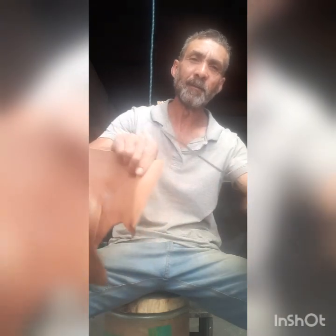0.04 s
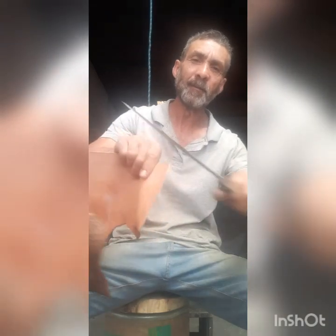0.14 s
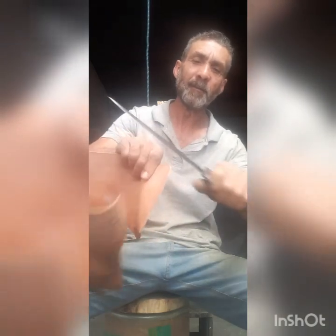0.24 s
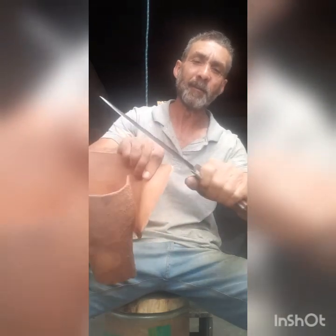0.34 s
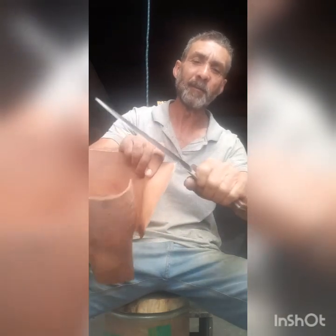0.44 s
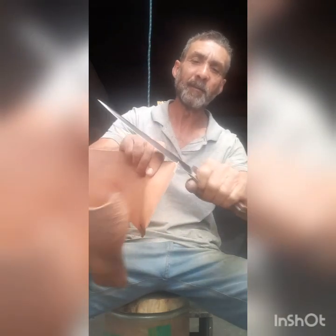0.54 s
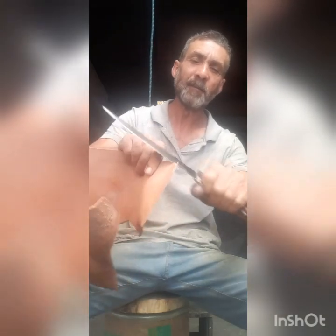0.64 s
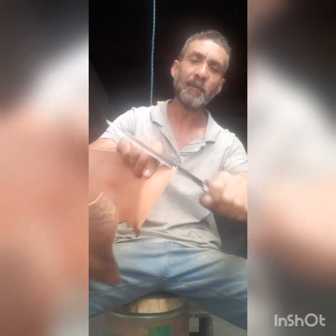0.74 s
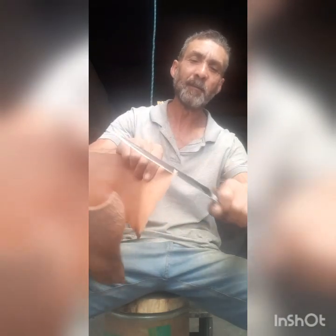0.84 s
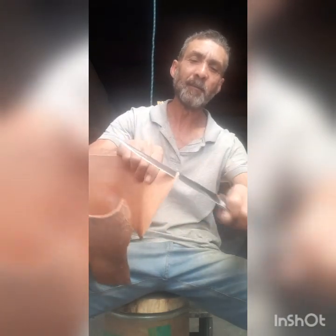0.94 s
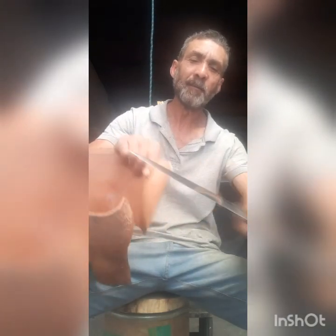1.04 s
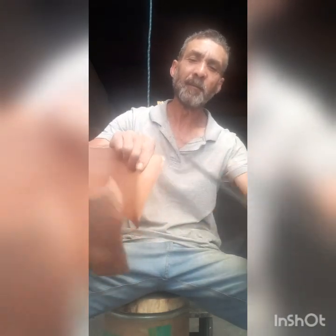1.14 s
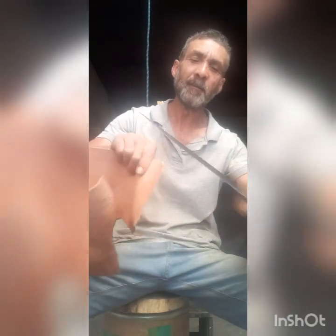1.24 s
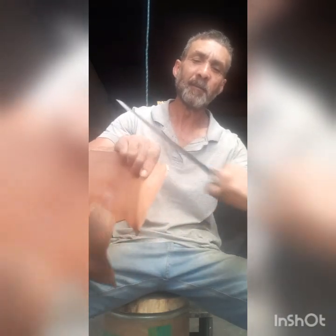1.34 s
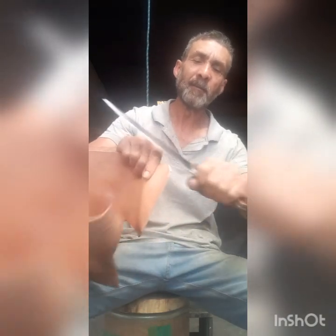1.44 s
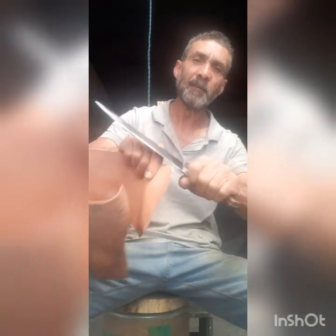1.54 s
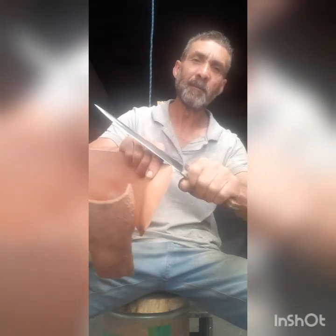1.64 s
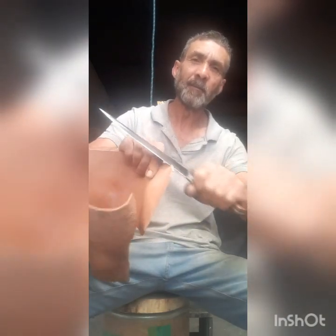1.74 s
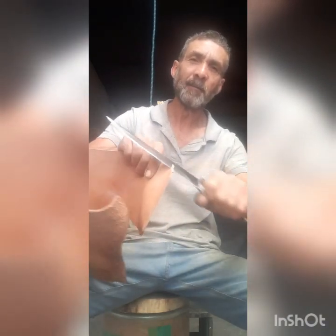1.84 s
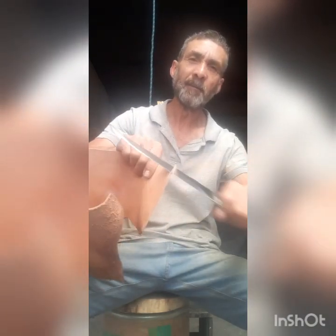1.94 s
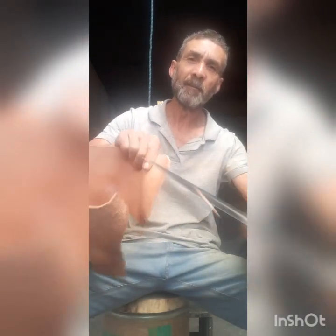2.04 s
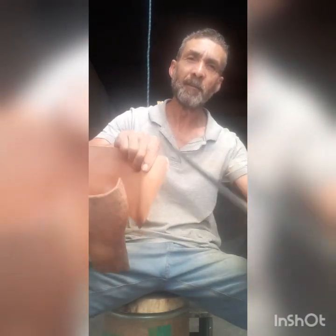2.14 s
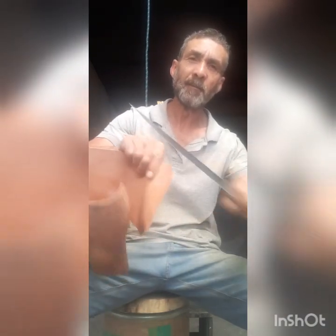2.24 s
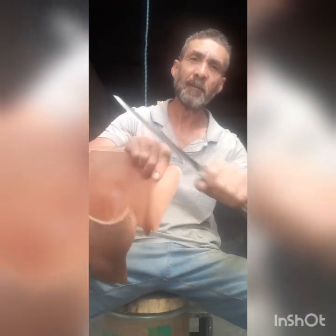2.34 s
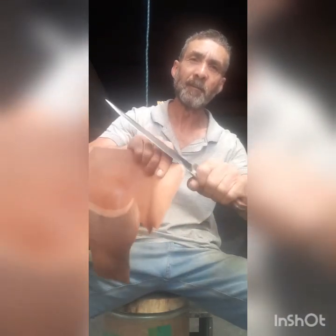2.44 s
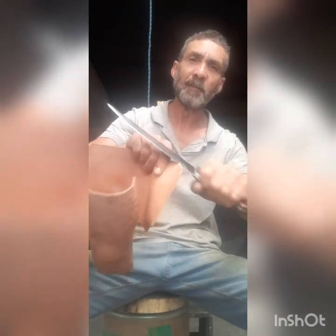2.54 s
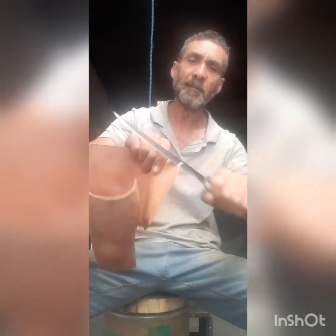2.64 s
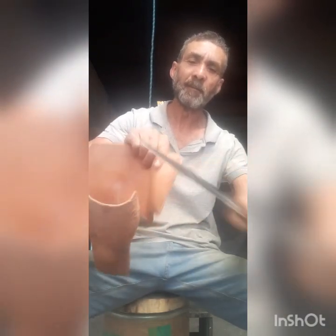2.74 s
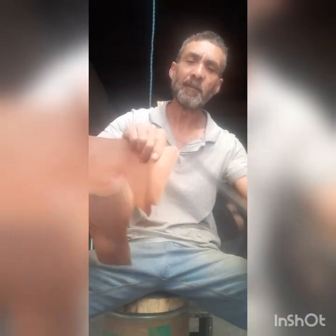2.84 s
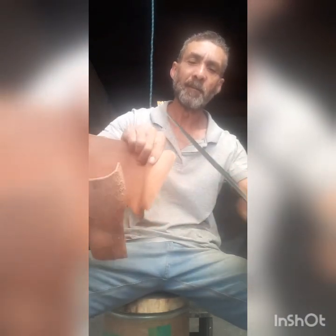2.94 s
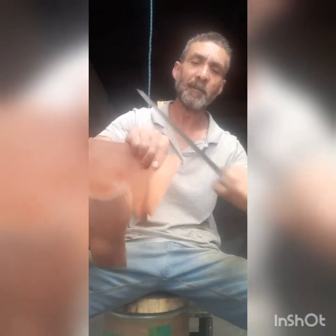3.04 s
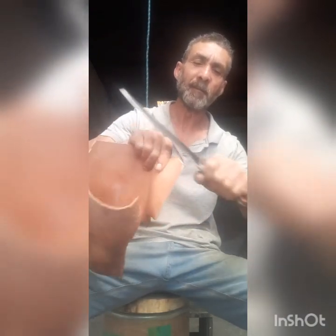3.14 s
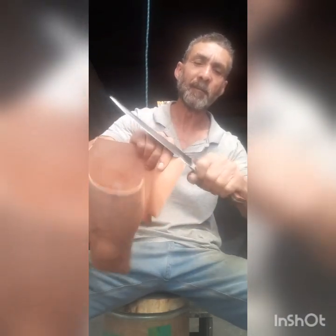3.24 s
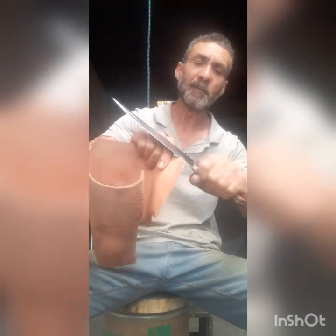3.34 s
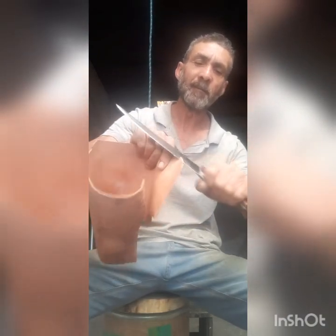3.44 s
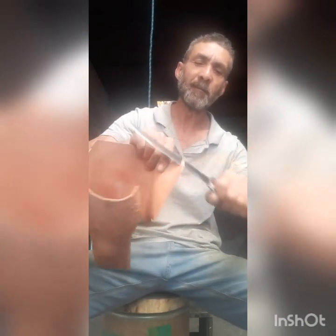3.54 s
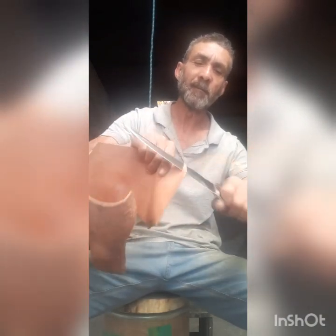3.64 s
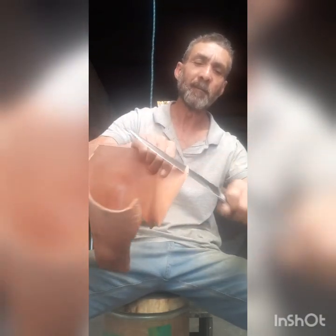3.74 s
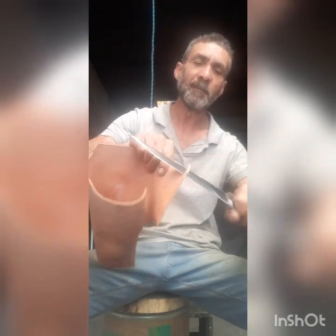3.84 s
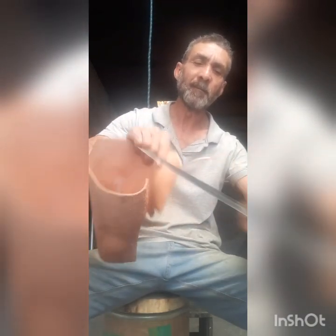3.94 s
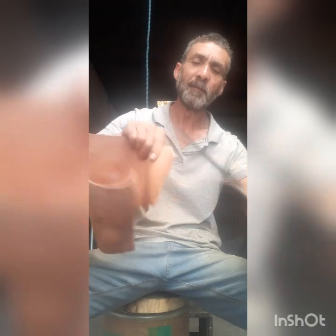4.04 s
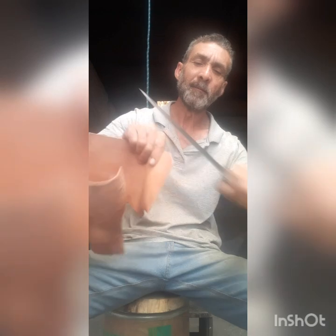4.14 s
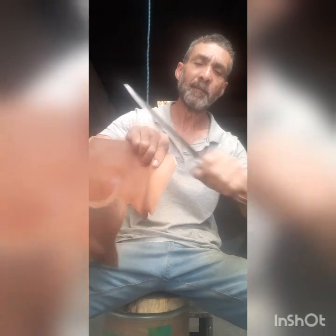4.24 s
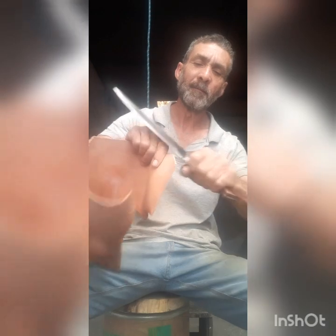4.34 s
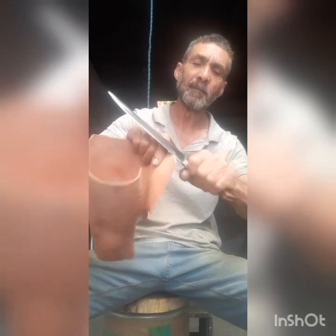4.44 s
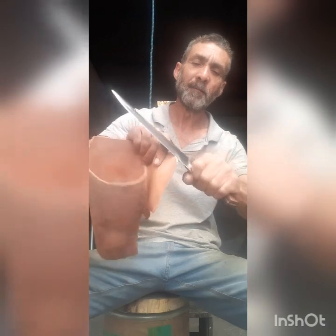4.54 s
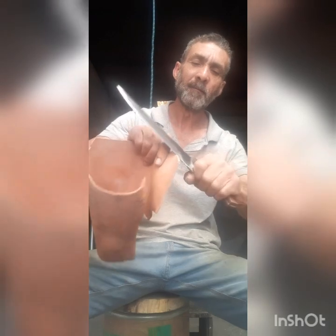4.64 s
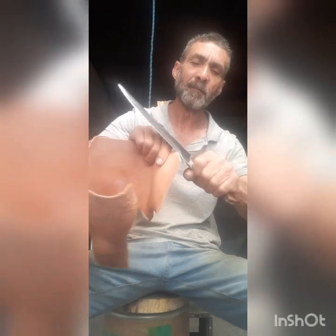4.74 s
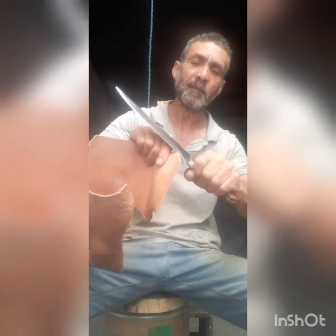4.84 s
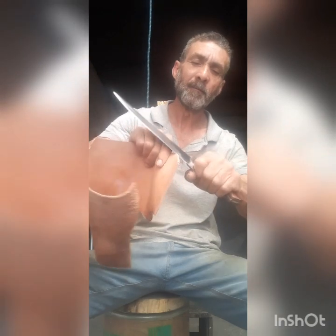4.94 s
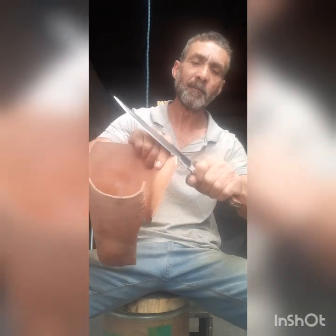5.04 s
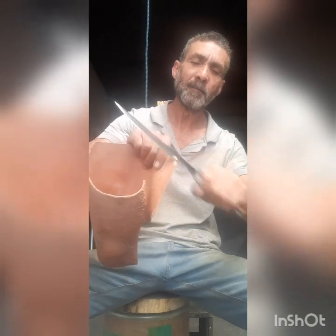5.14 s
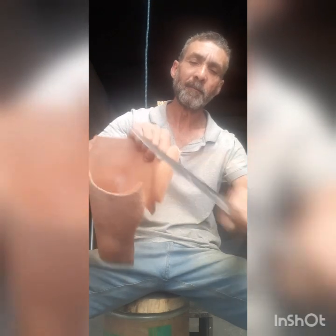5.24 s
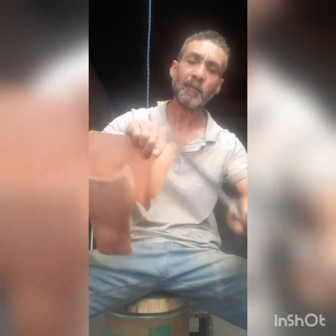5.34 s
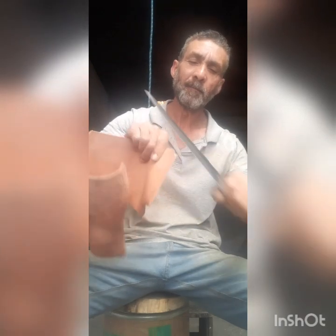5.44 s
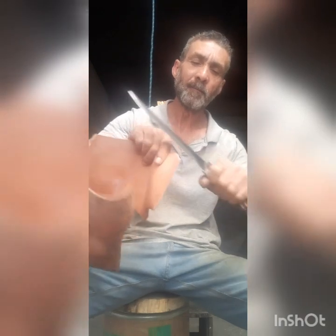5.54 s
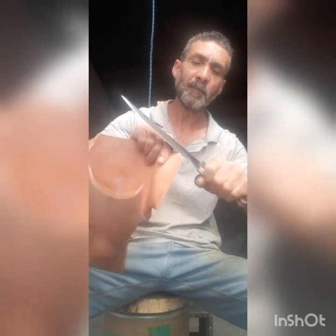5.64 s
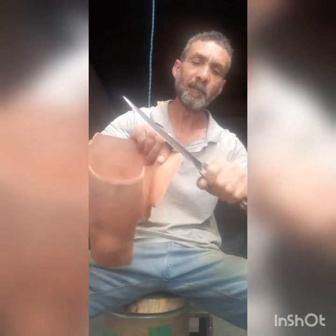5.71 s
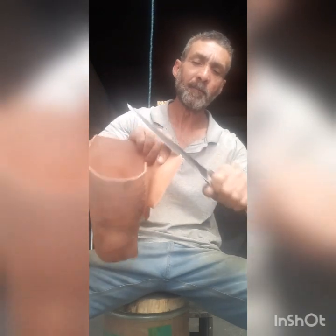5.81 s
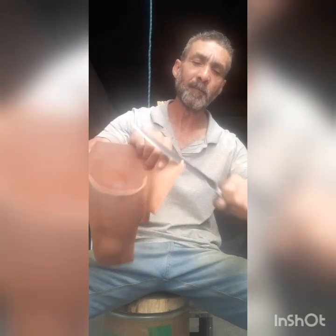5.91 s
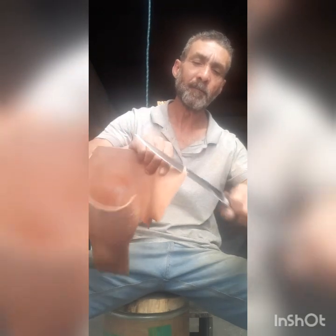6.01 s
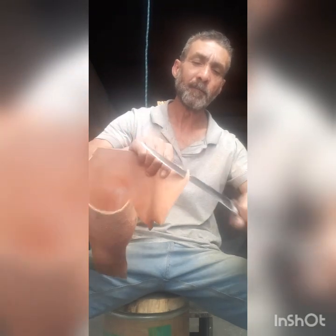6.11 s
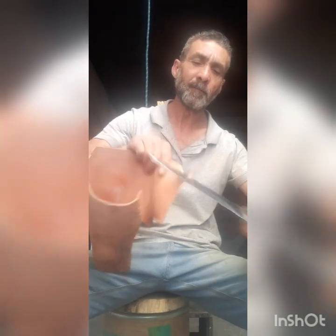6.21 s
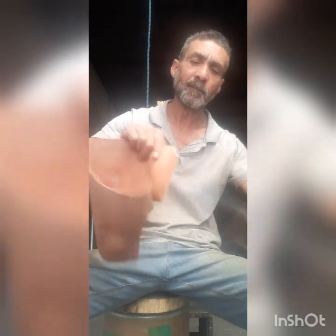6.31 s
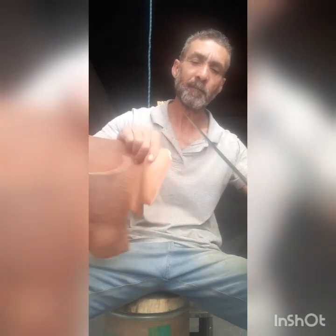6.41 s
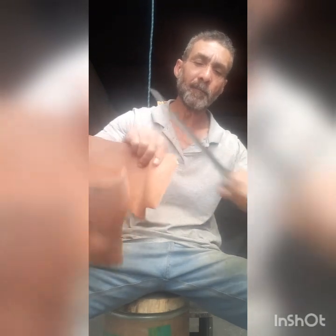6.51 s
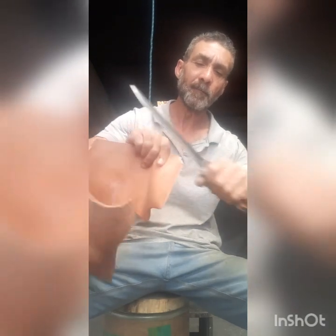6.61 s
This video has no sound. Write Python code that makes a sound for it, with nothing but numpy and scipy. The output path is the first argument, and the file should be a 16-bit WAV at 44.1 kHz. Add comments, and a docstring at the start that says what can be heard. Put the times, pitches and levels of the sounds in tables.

```python
"""A low engine-like drone flutters over rumble and a hiss that dims in places; a tick and a rustle, then a bird.
Soon a long knife is drawn across the edge of a stiff hide in short strokes, an arm's length from a phone in a shed.
The edge sticks and slips: random knocks ring the hide's modes, and brighter ones hiss as fibres part.
Its jumps thump the hide and ping the blade. Shaped noise makes dry ticks and soft rustles, from the sheet settling
after strokes and hands on leather; near the end a small metal thing clinks: decaying modes shaken by a rattle."""
import sys
import numpy as np
from scipy import signal
from scipy.fft import rfft, irfft, next_fast_len
from scipy.io import wavfile
from scipy.ndimage import uniform_filter1d, map_coordinates

SR = 44100
rng = np.random.default_rng(int(sys.argv[2]) if len(sys.argv) > 2 else 0)


def generate_wav(signal):
    """Clip the signal to [-1, 1] and save it as 16-bit WAV at the path in sys.argv[1]."""
    frames = np.transpose(np.atleast_2d(signal))
    scaled = np.clip(frames, -1, 1) * 32767
    pcm = np.round(scaled).astype(np.int16)
    wavfile.write(sys.argv[1], SR, pcm)


N = 294147  # length in samples
TIME = np.arange(N) / SR  # seconds


def undb(db):
    """Turns decibels into a plain multiplier."""
    return 10 ** (np.asarray(db) / 20)


def level(x, db):
    """Sets the average (RMS) strength of a sound."""
    return x * undb(db) / np.sqrt(np.mean(x ** 2))


def over_hz(table, size):
    """Table values at every frequency bin, joined by straight lines on a log-frequency axis."""
    hz, value = np.transpose(table)
    bins_hz = np.fft.rfftfreq(size, 1 / SR)
    return np.interp(np.log(bins_hz + 1), np.log(hz + 1), value)


def colour(x, table):
    """Makes some pitches stronger and others weaker, following a (pitch_hz, level_db) table."""
    size = next_fast_len(N)
    shaped = rfft(x, size) * undb(over_hz(table, size))
    return irfft(shaped, size)[..., :N]


def filtered(x, order, hz, kind):
    """Keeps only what lies below ("low") or above ("high") a pitch."""
    return signal.sosfilt(signal.butter(order, hz, kind, fs=SR, output="sos"), x)


def ring(x, hz, t60):
    """One mode: each push on it sets off a tone that falls 60 dB in t60 seconds."""
    decay = np.exp(-np.log(1000) / (max(t60, .001) * SR))
    turn = 2 * np.pi * hz / SR
    return signal.lfilter([0, decay * np.sin(turn)], [1, -2 * decay * np.cos(turn), decay * decay], x)


def walk(rate):
    """A smooth random wander: a new value every 1 / rate s, smoothed twice, with a spread near 1."""
    hold = int(SR / rate)
    steps = np.repeat(rng.standard_normal(N // hold + 1), hold)
    smooth = uniform_filter1d(uniform_filter1d(steps, hold), hold)
    return 1.116 * smooth[:N]


def grit(rate, spread_db, noise):
    """Friction: two rows of random slips (rate per s), some larger than others, over fine noise."""
    size = undb(spread_db * np.minimum(rng.exponential(size=(2, N)), 2.5))
    slips = (rng.random((2, N)) < rate / SR) * size * rng.choice([-1, 1], size=(2, N))
    fine = noise * rng.standard_normal((2, N))
    return (level(slips, 0) + fine) / np.hypot(1, noise)


def burst(s, t60):
    """Envelope that starts at once and dies away."""
    return (TIME >= s) * np.exp(-np.log(1000) * np.maximum(TIME - s, 0) / max(t60, .002))


def swell(s, db, rise, t60):
    """Envelope that swells 60 dB in rise seconds to its loudest moment and fades 60 dB in t60 seconds."""
    return undb(db - 60 * np.maximum((s - TIME) / rise, (TIME - s) / t60))


def tone(table, waver, flutter_db, rate):
    """Loudness and phase of a tone on a (time_s, pitch_hz, level_db) track, wavering in pitch and level."""
    s, hz, db = np.transpose(table)
    pitch = np.interp(TIME, s, hz) * (1 + waver * walk(rate))
    phase = 2 * np.pi * np.cumsum(pitch) / SR
    size = uniform_filter1d(undb(np.interp(TIME, s, db, -200, -200)), size=256)
    return np.sqrt(2) * size * undb(flutter_db * walk(rate)), phase


# the bird's whistled notes: time_s, pitch_hz, level_db (relative)
BIRD = [(.3, 5200, -80), (.34, 5520, -70), (.39, 5700, -68), (.48, 5750, -65), (.53, 5710, -71),
        (.59, 5700, -72), (.61, 5680, -82)]


def bird_whistle():
    """A tone roughened by slow noise, with a breathy edge just below its pitch."""
    size, phase = tone(BIRD, .003, 1.5, 50)
    breath = uniform_filter1d(uniform_filter1d(rng.standard_normal(N), size=90), size=90)
    breath = level(breath, -1.4)
    return size * (np.sin(phase) * (1.2 + .6 * breath) + .7 * breath * np.sin(.95 * phase))


SQUEAK_S, SQUEAK_HZ, SQUEAK_DB = 2.21, 12200, -79


def faint_squeak():
    """Noise squeezed through two short modes at one high pitch, swelling briefly."""
    noise = ring(ring(rng.standard_normal(N), SQUEAK_HZ, .003), SQUEAK_HZ, 0.0035)
    return level(noise, SQUEAK_DB) * np.exp(-((TIME - SQUEAK_S) / 0.046) ** 2)


# the low hum: time_s, pitch_hz, level_db (relative)
HUM = [(0.0, 65, -60), (0.43, 79, -67.5), (1.06, 74.1, -59), (1.45, 76.8, -75.5), (1.6, 66.1, -63.5),
       (2.23, 66.5, -62.5), (2.8, 74.6, -65), (2.92, 69.6, -74), (3.27, 71.8, -58.5), (4.48, 79.9, -67.5),
       (4.79, 75.5, -75), (5.16, 79.4, -60.5), (5.79, 80.6, -68.5), (5.89, 73.9, -64), (6.08, 80.9, -62),
       (6.67, 77.5, -48)]


def low_hum():
    """An unsteady engine-like drone: a fluttering low tone with a weaker octave above."""
    size, phase = tone(HUM, 0.0205, 2.6, 14)
    return size * (np.sin(phase) + undb(-13.5) * np.sin(2 * phase))


# background noise level over time: time_s, rumble_db, hiss_db (relative levels)
BACKGROUND = [(0, -61.5, -60), (.55, -62.5, -63), (1.3, -65, -65), (1.62, -67, -73), (2.3, -70.5, -75.5),
              (2.95, -63.5, -63.5), (3.25, -65, -73.5), (4.3, -68, -78), (4.55, -61.5, -69),
              (4.9, -63.5, -82), (5.62, -70, -75), (6.45, -61, -70), (6.67, -59, -64)]
# colour of the background noise: pitch_hz, level_db (dB per Hz)
BACKGROUND_COLOUR = [(30, -13), (55, -3.5), (100, 3.5), (157, 2), (200, -6), (270, -1.5), (330, -0.5),
                     (460, -18), (960, -18), (2160, -23), (5400, -34.5), (7000, -33), (9500, -51),
                     (16000, -51)]


def background_noise():
    """Shaped noise split at 600 Hz into a low rumble and a treble hiss that dims in places."""
    s, rumble_db, hiss_db = np.transpose(BACKGROUND)
    wash = colour(rng.standard_normal((2, N)), BACKGROUND_COLOUR)
    rumble = level(filtered(wash, 4, 600, "low"), 3)
    rumble = rumble * undb(np.interp(TIME, s, rumble_db) + 1.5 * walk(5))
    hiss = level(filtered(wash, 4, 600, "high"), 0)
    return rumble + hiss * undb(np.interp(TIME, s, hiss_db))


def background():
    """All the background sounds, added together."""
    return bird_whistle() + faint_squeak() + low_hum() + background_noise()


SHED_DB = -13.5  # strength of the tail
# how long the shed rings on: pitch_hz, t60_s (time to fall 60 dB)
SHED_T60 = [(100, 0.77), (1000, 0.64), (3000, 0.35), (12000, 0.26)]


def shed(x):
    """Two unrelated noise tails for the room's many reflections; the treble dies sooner than the bass."""
    t = np.arange(SR) / SR
    f, frames, spec = signal.stft(rng.standard_normal((2, SR)), SR, nperseg=256)
    spec = spec * np.exp(-np.log(1000) * frames / over_hz(SHED_T60, size=256)[:, None])
    tail = signal.istft(spec, SR, nperseg=256)[1][:, :SR] * (t > .006)
    tail = tail / np.sqrt(np.sum(tail ** 2, axis=1, keepdims=True))
    return undb(SHED_DB) * signal.fftconvolve(x[None], tail, axes=1)[:, :N]


CLINK_S, CLINK_DB, CLINK_RATTLE_S = 6.486, -37, 0.072  # start, level, length of the rattle
# the modes of the small metal thing: pitch_hz, peak_db (relative), t60_s
METAL = [(336, -1, .3), (1190, -7, .45), (1351, -11, .55), (1540, -3, .27), (1610, -10, .2),
         (1814, -7, .25), (1916, -11, .25), (2019, -10, .2), (2180, -6, .2), (2670, -7, .22),
         (2896, -16, .15), (3790, -10, .12), (4118, -8, .12)]


def clink():
    """A small metal thing is knocked and rattles for a moment; each mode swells to its own peak."""
    rise = np.clip((TIME - CLINK_S) / CLINK_RATTLE_S, 0, 1)
    blow = np.sin(np.pi * rise ** 0.4) * rng.standard_normal((2, N))
    ringing = 0
    for hz, db, t60 in METAL:
        mode = ring(blow, hz, t60)
        ringing = ringing + undb(db) * mode / np.abs(mode).max(axis=1, keepdims=True)
    # a very short mode gives the dull knock
    clack = level(ring(blow, 2300, 0.0023), 0) / np.sqrt(N / SR / CLINK_RATTLE_S)
    return undb(CLINK_DB) * (ringing + undb(-11) * clack)


# colour of the soft rustles: pitch_hz, level_db (dB per Hz)
RUSTLE = [(500, -14.5), (1000, -2.5), (1850, -10.5), (3140, -11), (5300, -9.5), (7450, -9), (10300, -30),
          (14500, -22.5), (16000, -16.5)]
# each rustle: loudest_s, level_db, rise_s (60 dB up), t60_s (60 dB down)
RUSTLES = [(.123, -54.5, .01, .3), (.52, -68, 0.25, 0.87), (1.02, -52.5, .05, .55),
           (1.39, -64.5, .05, 1.46), (1.97, -53.5, .05, 0.67), (2.43, -71, 0.55, 1.5),
           (2.72, -56, .05, 0.47), (2.97, -62, 0.58, 1.1), (3.264, -71, 0.26, 0.082),
           (3.95, -60, .05, 0.82), (4.738, -63, 0.96, 0.78), (4.97, -65, 0.12, .15),
           (5.231, -51.5, .05, 0.84), (6.26, -54.5, .05, 0.64), (6.492, -50, 0.068, 0.23),
           (6.618, -51, 0.026, 0.14)]
# dry ticks with a hissy tail: start_s, level_db, tail_t60_s, tail_db (against the crack), low_edge_hz
TICKS = [(.12, -45, 0.053, 5, 3540), (.39, -71, 0.07, -8, 5640), (1.385, -44, 0.21, 3, 1210),
         (2.389, -52.5, 0.19, 0.5, 2534), (3.241, -56, 0.087, -10, 2490), (4.393, -30, 0.46, -3, 3400),
         (4.49, -41, 0.14, -3.5, 1500), (4.625, -57.5, 0.33, 8, 6010), (4.972, -45, .05, -13, 3015),
         (5.089, -48, .04, -8, 5000), (6.487, -30.5, 0.13, -6, 1190), (6.614, -46, .12, 1, 3560)]


def rustles_and_ticks():
    """Soft rustles, the sheet settling after strokes and hands on leather, are swelling grit; ticks are bursts."""
    rubbing = colour(grit(3000, 1.5, 2.5) * undb(1.5 * walk(25)), RUSTLE)
    out = level(rubbing, 0) * sum(swell(*row) for row in RUSTLES)
    crisp = level(colour(rng.standard_normal((2, N)), FIBRES), -7.5)
    soft = level(colour(rng.standard_normal((2, N)), RUSTLE), -7.5)
    for s, db, t60, tail_db, low_hz in TICKS:
        span = slice(int(s * SR), int((s + .5) * SR))
        crack = burst(s, 0.027) * crisp + undb(tail_db) * burst(s, t60) * soft
        out[:, span] += undb(db) * filtered(crack[:, span], 6, low_hz, "high")
    return out


def body(force, modes, drift_db, tilt_db):
    """Rings a set of modes; the moving contact feeds each unevenly. Unit noise gives about unit level."""
    out = 0
    for k, (hz, width, db) in enumerate(modes):
        # tilt_db is dB per octave around 900 Hz
        feed = undb(db + drift_db * walk(14) + tilt_db * np.log2(hz / 900))
        # a wider mode dies sooner
        out = out + (-1) ** k * width * ring(force * feed, hz, np.log(1000) / (np.pi * width))
    power = sum(undb(2 * db) * width for hz, width, db in modes) * SR / (4 * np.pi)
    return out / np.sqrt(power)


# close reflections off chest, lap and the curled sheet: delay_s, level_db (relative)
ECHOES = [(.0013, -8), (.0029, -7), (.0047, -9)]


def echo(x):
    """Adds close reflections; their delays creep at random as the blade travels, so the colour shifts."""
    out = x
    rows = np.repeat([[0], [1]], N, axis=1)
    for s, db in ECHOES:
        late = TIME - s * (1 + .09 * walk(4))
        places = np.tile(np.round(late * SR), (2, 1))
        out = out + undb(db) * map_coordinates(x, [rows, places], order=0)
    return undb(-2) * out


# strokes of the knife: bite_s, peak_s, end_s, scrape_bite_db, scrape_peak_db,
# hiss_bite_db, hiss_peak_db, tilt_db (brightness, dB per octave)
PUSHES = [(.5, 0.562, 0.72, -85, -73, -81, -66, -5), (0.615, 0.848, 0.93, -46.5, -35.5, -52, -46.5, -3),
          (0.942, 0.994, 1.012, -42, -30.5, -52.5, -40, -1.5),
          (1.694, 1.755, 1.795, -53, -40, -54.5, -42.5, -1.5),
          (1.789, 1.946, 1.954, -40.5, -30, -46, -39.5, -1), (2.53, 2.659, 2.704, -43, -30, -42, -39, 0.2),
          (3.335, 3.36, 3.4, -47.5, -43, -47, -44, 1.3), (3.419, 3.466, 3.575, -44, -31, -42.5, -35.5, 0.7),
          (3.61, 3.767, 3.92, -59, -33, -60.5, -43.5, -0.7),
          (3.903, 3.913, 3.932, -36.5, -37.5, -46, -43, -0.3), (4.29, 4.36, 4.38, -85, -85, -75, -75, -2),
          (4.973, 5.146, 5.15, -63.5, -35.5, -63.5, -38, 1),
          (5.166, 5.171, 5.204, -39, -33, -35.5, -37, 3.5),
          (5.709, 5.892, 6.017, -51.5, -38.5, -53.5, -41.5, 0),
          (6.02, 6.174, 6.24, -40.5, -38, -49.5, -46.5, 1),
          (6.176, 6.229, 6.22, -36.5, -29, -46.5, -37.5, -0.5)]
LAND_DB_PER_S = 797  # how fast every stroke rises before its bite


def pushes(bite_db, peak_db, ease, lift):
    """Level in dB: each push lands fast, moves to its peak, eases off and drops as the edge lets go."""
    out = np.full(N, -200.)
    for (bite_s, peak_s, end_s), first, top in zip(np.array(PUSHES)[:, :3], bite_db, peak_db):
        last = top - ease * (end_s - peak_s)
        db = np.interp(TIME, [bite_s, peak_s, end_s], [first, top, last])
        db = db - LAND_DB_PER_S * np.maximum(bite_s - TIME, 0) - lift * np.maximum(TIME - end_s, 0)
        out = np.maximum(out, db)
    return uniform_filter1d(out, size=128)


SCRAPE_EASE_DB_PER_S, HISS_EASE_DB_PER_S = 61, 92  # fall from peak to end
SCRAPE_LIFT_DB_PER_S, HISS_LIFT_DB_PER_S = 802, 623  # fall after the end
TILT_PER_DB = 0.1329  # extra dB per octave for each dB of pressing
STEEL_DB = -14  # singing steel against the fibre hiss
# modes of the stiff hide: pitch_hz, width_hz, level_db (relative)
HIDE = [(318.3, 22.3, -1), (397, 36, -5), (529, 92, -9), (618, 41, -5.5), (698, 40, 1), (872, 87, 2.5),
        (977, 136, -1), (988, 39, 5.5), (1141, 31, -3.5), (1336, 74, -0.5), (1480, 56, -3), (1607, 99, -6),
        (1930, 153, -9.5), (2315, 230, -20), (1000, 630, -12.5)]
# colour of parting fibres: pitch_hz, level_db (dB per Hz)
FIBRES = [(880, -6), (1500, -12.5), (1760, -19.5), (2040, -3), (2800, -7), (3350, -3.5), (3730, -10),
          (4420, -4), (5330, -14.5), (5830, -7), (7460, -1.5), (10500, -20.5), (11900, -12), (15100, -7.5),
          (16000, -39)]
# steel modes sung by the friction: pitch_hz, width_hz, level_db (relative)
STEEL = [(2750, 38, 8), (3386, 200, 5.5), (4210, 68, 7), (4550, 40, -21), (5880, 69, 11.5), (7280, 98, 5),
         (7267, 100, 14.5), (8200, 100, -8)]
# the edge jumps or comes free: time_s, thump_db (relative), ping_db (blade against thump)
JUMPS = [(1.004, -25, -27), (1.947, -27, -39), (2.429, -47.5, -45), (2.525, -37, -39), (2.657, -40, -30),
         (2.697, -32, -37), (3.32, -51, -30), (3.922, -21, -34), (5.203, -28, -45), (5.699, -50, -30),
         (6.228, -15, -34), (6.314, -31.5, -39)]
# the blade's ping: pitch_hz, level_db (relative), t60_s
BLADE = [(4800, -7, 0.12), (6885, -8, .5), (14000, 7, 0.13)]


def knife():
    """Stick and slip ring the hide, cut fibres hiss, and jumps of the edge thump, snap and ping the blade."""
    _, peaks, _, scrape_bite, scrape_peak, hiss_bite, hiss_peak, tilt = np.transpose(PUSHES)
    press_db = pushes(scrape_bite, scrape_peak, SCRAPE_EASE_DB_PER_S, SCRAPE_LIFT_DB_PER_S)
    # the harder the edge presses, the brighter the hide rings
    short_db = np.maximum(press_db - np.interp(TIME, peaks, scrape_peak), -25)
    tilt_db = np.interp(TIME, peaks, tilt) + TILT_PER_DB * short_db
    force = grit(1200, 2.3, 0.76) * undb(1.5 * walk(40) + press_db)

    thump, flick = np.zeros(N), np.zeros(N)
    for s, db, ping_db in JUMPS:
        thump[int(s * SR)] = undb(db)
        flick[int(s * SR)] = undb(db + ping_db)
    scrape = body(force + undb(9.0) * thump, HIDE, 1.92, tilt_db)
    scrape = filtered(scrape, 2, 240, "high")  # a thin sheet radiates little bass
    snap = undb(5) * ring(thump, 1370, 0.001)
    ping = sum(undb(db) * ring(flick, hz, t60) for hz, db, t60 in BLADE)

    rasp = grit(2500, 6.0, 0.85) * undb(1.0 * walk(45))
    hiss = level(colour(rasp, FIBRES), 0) + undb(STEEL_DB) * body(rasp, STEEL, 3.5, 0)
    hiss = hiss * undb(pushes(hiss_bite, hiss_peak, HISS_EASE_DB_PER_S, HISS_LIFT_DB_PER_S))
    return scrape + echo(hiss) + snap + ping


PORT_LAG_S = 6e-5  # the right port hears this much later
# the two microphone ports: pitch_hz, difference_db (left minus right)
PORT_DB = [(60, -2.5), (110, -2.5), (200, -1.0), (380, -3.0), (700, -1.0), (1290, -0.5), (2380, -3.5),
           (4400, -4.0), (8120, -6.5), (15000, -10.5)]
# how alike the two ports sound: pitch_hz, likeness (0 to 1)
ALIKE = [(50, 1), (300, 0.9), (1000, 0.6), (2500, 0.4), (5000, 0.43), (9000, 0.43), (15000, 0.47)]


def ports(pair):
    """Left hears one row; right hears it late, blended with the other row, and louder, most in the treble."""
    size = next_fast_len(N)
    a, b = rfft(pair, size)
    alike = np.clip(over_hz(ALIKE, size), 0, 1)
    late = np.exp(-2j * np.pi * np.fft.rfftfreq(size, 1 / SR) * PORT_LAG_S)
    right = late * (alike * a + np.sqrt(1 - alike ** 2) * b)
    tilt = over_hz(PORT_DB, size) / 2
    return irfft(np.array([a, right]) * undb([tilt, -tilt]), size)[:, :N]


CLINK_PAN_DB = 5  # second row over first, before the ports blend them


def scene():
    """Adds the near sounds, their tail in the shed and the background, as heard by the two ports."""
    pan = undb([[-CLINK_PAN_DB / 2], [CLINK_PAN_DB / 2]])
    near = knife() + echo(rustles_and_ticks()) + clink() * pan
    return ports(near + shed(near[0]) + background())


MIC_LOW_HZ, MIC_HISS_DB, TOP_HZ = 53, -84.5, 15850


def record(dry):
    """The phone drops the deepest bass, hisses faintly and cuts the top."""
    x = filtered(dry, 4, MIC_LOW_HZ, "high")
    x = x + undb(MIC_HISS_DB) * rng.standard_normal(x.shape)
    return signal.sosfilt(signal.ellip(10, .2, 70, TOP_HZ, fs=SR, output="sos"), x)


dry = scene()
out = record(dry)
generate_wav(out)
```